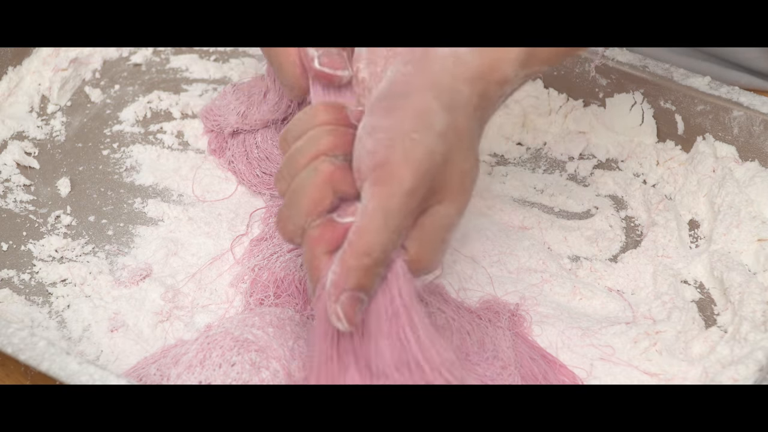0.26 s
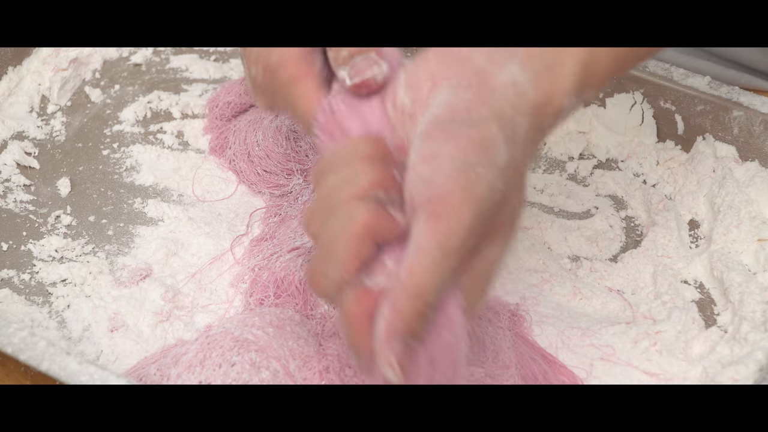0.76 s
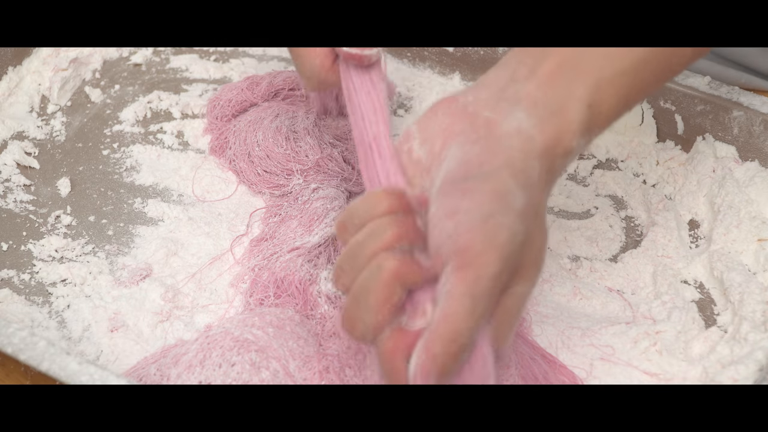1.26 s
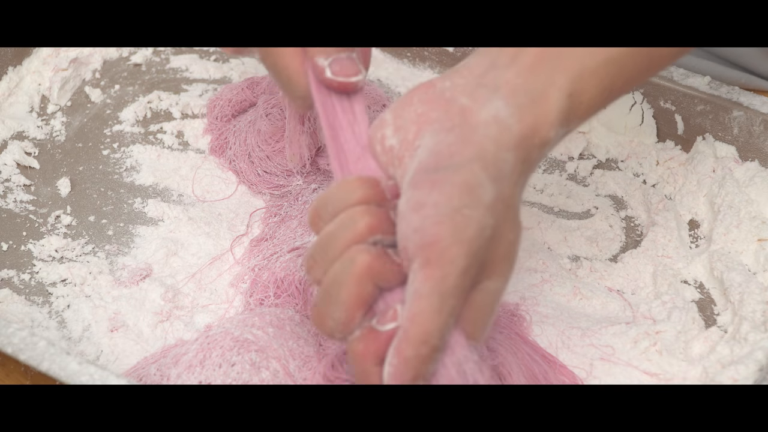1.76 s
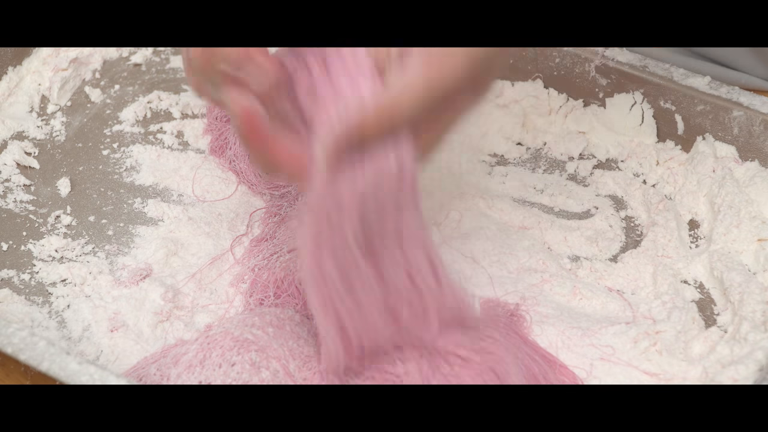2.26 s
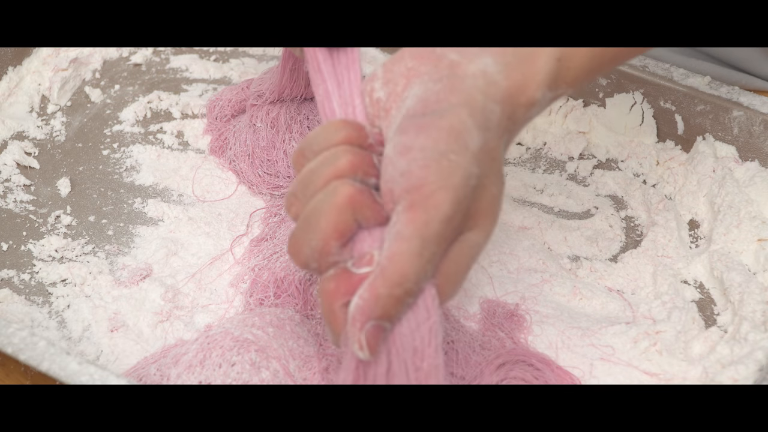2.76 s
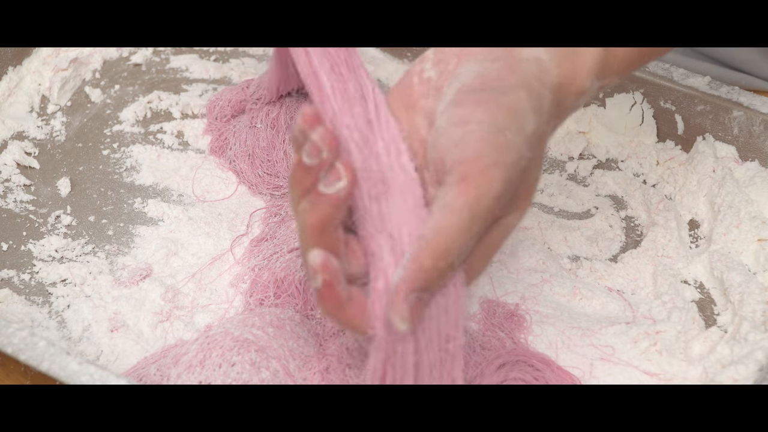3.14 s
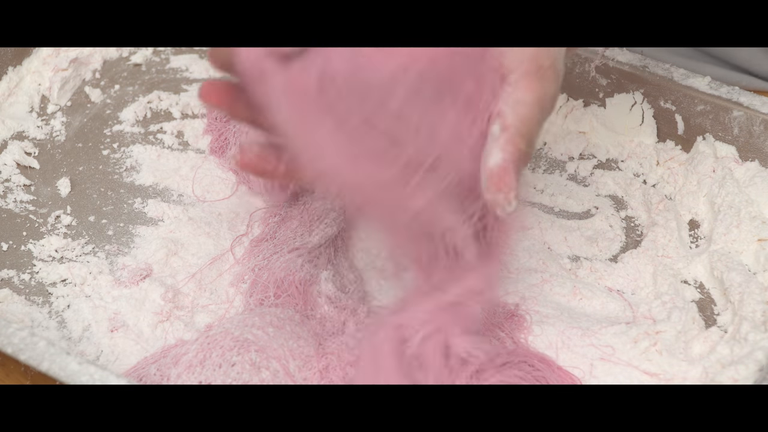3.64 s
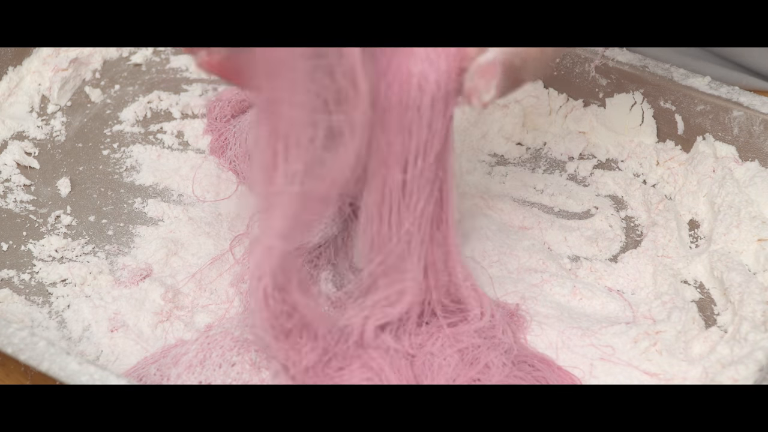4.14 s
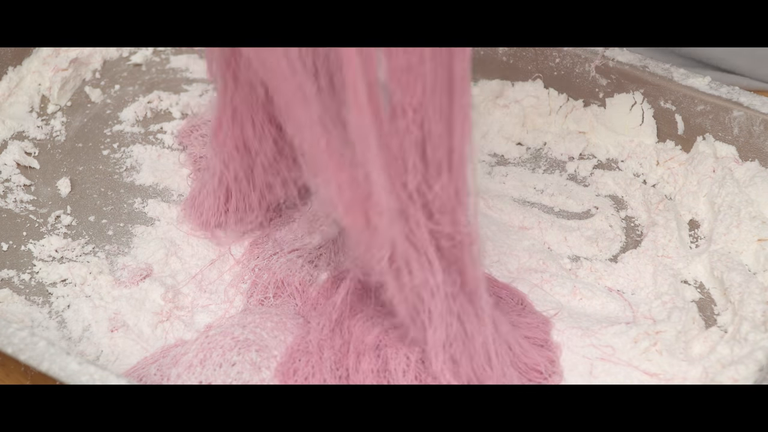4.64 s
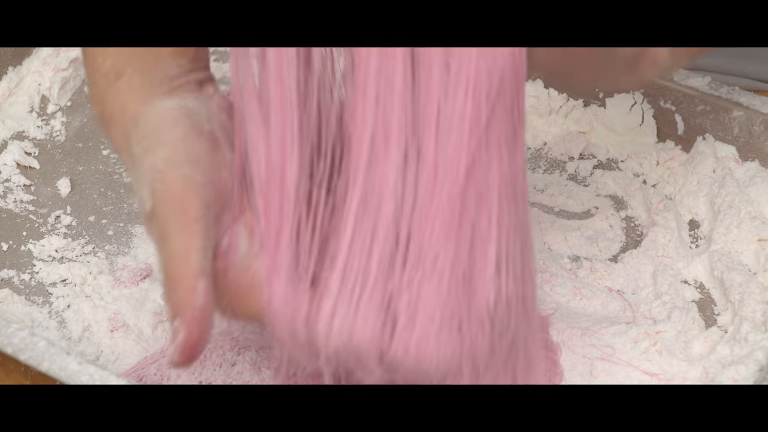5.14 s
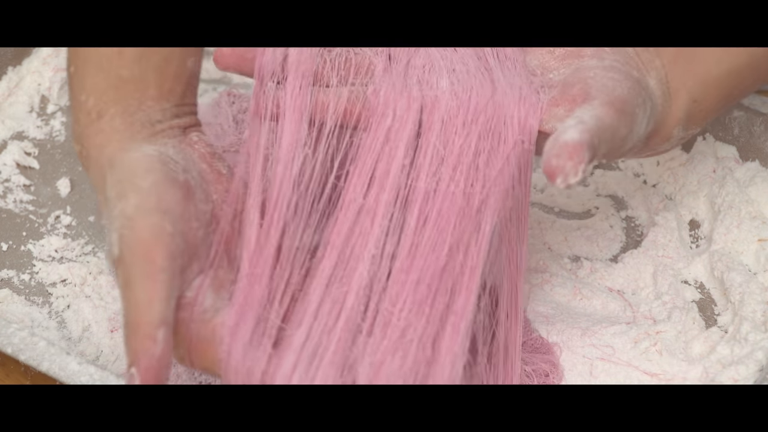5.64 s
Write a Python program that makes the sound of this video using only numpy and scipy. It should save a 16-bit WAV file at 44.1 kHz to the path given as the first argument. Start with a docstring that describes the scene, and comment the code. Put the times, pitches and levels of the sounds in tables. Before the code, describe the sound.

Close dry rustling swishes of fine candy strands pulled through powder, small finger ticks, a squeaky distant bird call and one crisp snap in a humming hall.

```python
"""Candy strands and a bird in a hall

Hands pull and fold a skein of fine candy strands in a tray of cornstarch, close to the microphone.
Rubbing and powder hiss are shaped noise; finger ticks and a snapping strand are damped modes; folds are low pulses.
Farther off in an echoing hall with a low hum, a bird whistles faintly and then gives a squeaky two-note call:
nearly pure tones on gliding pitches, the call roughened by a fast trill."""
import sys
import numpy as np
from scipy import signal
from scipy.fft import rfft, irfft, next_fast_len
from scipy.io import wavfile
from scipy.ndimage import map_coordinates

SR = 44100
rng = np.random.default_rng(int(sys.argv[2]) if len(sys.argv) > 2 else 0)


def wav_record(signal):
    """Record a signal, one row per channel, as 16-bit PCM in the file named by sys.argv[1]."""
    frames = np.transpose(np.atleast_2d(signal))
    bounded = np.clip(frames, -1, 1)
    # unit amplitude maps onto the largest positive 16-bit level
    quanta = np.round(bounded * 32767).astype(np.int16)
    wavfile.write(sys.argv[1], SR, quanta)


N = 260631  # length [samples]
TIME = np.arange(N) / SR  # [s]

# Steady air noise of the hall, relative spectrum: (frequency [Hz], density [dB per Hz])
AIR_SPECTRUM = [(15, -24), (30, -15.5), (52, 3), (75, -8.5), (150, -5), (290, -8.5), (500, -16),
                (1000, -21.5), (2000, -25), (3700, -27.5), (4900, -27.5), (6200, -31), (15800, -35)]
# Partials of the mains hum: (frequency [Hz], rms level [dB])
HUM_PARTIALS = [(100, -68), (150, -77), (205, -82)]
# Reverberation of the hall: (frequency [Hz], time to fall 60 dB [s])
HALL_DECAY = [(300, 1), (3000, 0.94), (6000, 0.91), (14000, 0.2)]

# Pulls along the skein: (up to speed at [s], length [s], rubbing in the grip at that time [dB],
# powder hiss at its own start [dB], gain or loss of speed [dB per s])
PULLS = [(0.015, 0.026, -57.5, -61, -10), (0.126, 0.21, -66.5, -66.5, -24), (0.39, 0.15, -44.5, -43, -82),
         (0.583, 0.15, -63, -55, -36), (0.793, 0.15, -58.5, -61, 12), (0.986, 0.031, -60, -65, -20),
         (1.055, 0.16, -68.5, -76, -17), (1.342, 0.22, -62, -60, 13), (1.618, 0.13, -54, -50.5, -2),
         (1.795, 0.22, -59.5, -62, -95), (2.195, 0.19, -59, -57, 7), (2.455, 0.12, -58, -53.5, 24),
         (2.636, .12, -62, -68, -31), (2.82, 0.13, -69, -69.5, 20), (2.975, 0.12, -60, -60, 0),
         (3.239, 0.18, -64.5, -67, 18), (3.499, 0.15, -56.5, -57, -33), (3.68, .16, -62, -67, -26),
         (3.952, 0.081, -62, -60, -24), (4.07, 0.15, -64, -61, -7), (4.215, 0.15, -69.5, -64, -34),
         (4.517, 0.066, -62.5, -60, -36), (4.747, .57, -68, -66, -18.5)]
# Strands rubbing, relative spectrum: (frequency [Hz], density [dB per Hz])
RUB_SPECTRUM = [(200, -22), (600, -9.5), (1100, -9.5), (1350, -2.5), (1750, -0.5), (2250, 2), (3050, -6),
                (3600, -2.5), (4400, -1), (5300, -5), (6600, -11), (9000, -10.5), (16000, -28)]
# Starch hissing, relative spectrum: (frequency [Hz], density [dB per Hz])
POWDER_SPECTRUM = [(500, -17.5), (1200, -8), (2300, -6), (3050, -9), (4400, 0), (6500, -5.5), (9000, -3.5),
                   (12000, -3), (15500, -3)]
# Finger ticks, before softening: (time [s], level [dB], low knock relative to the tick [dB])
TICKS = [(0.068, -42, 0), (.2885, -42.5, -30), (1.785, -35, -0.5), (1.977, -47, -12), (1.995, -44, -17),
         (2.618, -33.5, -4.5)]
# Modes of a finger tick: (frequency [Hz], relative level [dB], time to fall 60 dB [s])
FINGER_MODES = [(850, -5, 0.002), (1650, -6.5, 0.006), (2400, -1.5, 0.0037)]
# Brief slips of the skein: (time of the peak [s], level [dB], half length [s], centre frequency [Hz])
SLIPS = [(0.393, -41, 0.027, 3130), (0.412, -44, 0.019, 8500), (0.524, -51.5, 0.023, 7500),
         (1.352, -53.5, 0.025, 2900), (1.528, -48.5, 0.0082, 10000), (1.623, -46.5, 0.023, 14100),
         (1.52, -61, 0.022, 2000), (1.75, -54, 0.024, 2270), (1.82, -59, 0.028, 1190),
         (2.209, -58.5, .02, 2780), (2.283, -55.5, 0.016, 12000), (2.377, -49, 0.02, 12000),
         (2.458, -51.5, 0.017, 13000), (2.498, -54.5, .018, 2800), (2.58, -45, 0.0071, 3460),
         (2.98, -50.5, 0.029, 2680), (3.269, -57, 0.023, 10000), (3.372, -57, .019, 10000),
         (3.556, -60, 0.028, 1800), (3.636, -61, .014, 11000), (3.752, -59, 0.013, 10000),
         (3.909, -55.5, 0.014, 9600), (3.966, -60.5, 0.019, 7000), (4.09, -53.5, .009, 8850),
         (4.541, -57, 0.022, 4930), (4.783, -59.5, 0.012, 8450), (4.833, -63.5, .011, 11000),
         (4.948, -67.5, 0.16, 1580)]

# Faint whistles of the bird, levels at the source:
# (loudest at [s], rise [s], fall [s], level [dB], opening [Hz], middle [Hz], closing pitch [Hz])
WHISTLES = [(0.745, 0.021, 0.082, -61.5, 3340, 3444, 3450), (0.746, 0.021, .03, -59, 3820, 3930, 4070),
            (0.885, 0.063, 0.022, -53, 2850, 3190, 3120), (0.945, .06, 0.048, -58, 3620, 3456, 3580),
            (0.975, .08, .04, -64, 3580, 3670, 3680), (0.957, .02, 0.052, -55, 3320, 3194, 2980),
            (1.053, 0.0354, .04, -54, 3010, 2884, 2475), (1.13, .045, 0.051, -58, 2570, 2754, 2730),
            (5.105, .035, .08, -67, 3650, 3740, 3660)]
# Rising high note of the call, level at the source: (time [s], pitch [Hz], level [dB], trill depth [Hz])
HIGH_NOTE = [(2.745, 3400, -48, 50.3), (2.772, 3395, -39, 116), (2.79, 3482, -32.5, 181),
             (2.82, 3597, -24, 231), (2.875, 3686, -29.5, 255), (2.905, 3608, -29.5, 255),
             (3.0, 3723, -38.5, 167), (3.14, 3780, -64, 140)]
# Arching low note of the call, level at the source: (time [s], pitch [Hz], level [dB], trill depth [Hz])
LOW_NOTE = [(2.76, 2753, -48.5, 226.6), (2.83, 2933, -39, 290), (2.93, 2826, -47.5, 290),
            (2.98, 2743, -34.5, 187), (3.05, 2906, -30, 170), (3.18, 2860, -29, 170),
            (3.25, 2745, -35.5, 168), (3.34, 2737, -48, 120)]

# Folds landing in the starch: (time [s], level [dB], frequency [Hz])
FOLDS = [(0.854, -49.5, 60), (1.519, -47.5, 70.5), (1.639, -51.5, 49.5), (2.35, -49, 48.7),
         (3.908, -47, 60), (4.08, -41.5, 77.4), (4.276, -49.5, 66)]
# Quick steps in which one strand tears: (time [s], level [dB])
TEAR_STEPS = [(3.5215, -20.5), (3.5220, -29.5), (3.5224, -22)]
# Modes of each small tear: (frequency [Hz], relative level [dB], time to fall 60 dB [s])
TEAR_MODES = [(4440, -0.5, 0.002), (6440, -6.5, 0.0023), (8320, -9, 0.0037), (13800, -15, .002)]
# Modes of the freed strand: (frequency [Hz], level [dB], rise time [s])
STRAND_MODES = [(1820, -25.5, 0.00059), (2670, -33.5, 0.0012), (4410, -33, 0.00026)]


def amp(db):
    """Logarithmic level: 20 dB is a factor of ten in amplitude."""
    return 10 ** (np.asarray(db) / 20)


def unit(x):
    """Normalization: scale a signal to rms 1."""
    return x / np.sqrt(np.mean(x ** 2) + 1e-20)


def along(points, hz):
    """Logarithmic frequency scale: interpolate (frequency, value) points on it."""
    f, v = np.transpose(points)
    return np.interp(np.log(hz + 1), np.log(f + 1), v)


def wobble(rate):
    """Band-limited fluctuation: a smooth curve through random knots, rate of them per second."""
    knots = rng.standard_normal(int(N * rate / SR) + 4)
    return map_coordinates(knots, [TIME * rate])


def filtered(x, response):
    """Linear filtering: multiply the spectrum by a response of frequency."""
    m = next_fast_len(N + SR // 2)
    hz = np.fft.rfftfreq(m, 1 / SR)
    return irfft(rfft(x, m) * response(hz), m)[:N]


def coloured(x, spectrum):
    """Spectral shaping: weight a signal by a tabulated spectrum, at rms 1."""
    return unit(filtered(x, lambda hz: amp(along(spectrum, hz))))


def grit(spread_db):
    """Stochastic friction: countless tiny slips, each of a random size."""
    sizes = amp(spread_db * rng.standard_normal(N))
    return rng.standard_normal(N) * sizes


def ring(modes):
    """Modal decay: one contact excites sinusoids that each die exponentially."""
    t = np.arange(SR // 10) / SR
    return sum(amp(db - 60 * t / t60) * np.sin(2 * np.pi * hz * t) for hz, db, t60 in modes)


def add(track, s, sound):
    """Superposition: mix a sound into the track at time s."""
    part = track[round(s * SR):][:len(sound)]
    part += sound[:len(part)]


def background(air_rms_db=-59.5):
    """Stationary noise: rumble and hiss of the hall, plus a mains hum with slightly wandering phases."""
    air = amp(air_rms_db) * coloured(rng.standard_normal(N), AIR_SPECTRUM)
    hum = np.zeros(N)
    for hz, rms_db in HUM_PARTIALS:
        phase = 2 * np.pi * hz * TIME + 0.21 * wobble(3.4)
        hum += np.sqrt(2) * amp(rms_db) * np.sin(phase)
    return air + hum


def hall(x):
    """Diffuse reverberation: convolve with a noise tail whose frequencies each decay at their own speed."""
    hz, t, z = signal.stft(rng.standard_normal(SR + SR // 2), SR, nperseg=256)
    decay = amp(-60 * t / along(HALL_DECAY, hz)[:, None])
    tail = signal.istft(z * decay, SR, nperseg=256)[1]
    return signal.fftconvolve(x, tail / np.linalg.norm(tail))[:N]  # tail of unit energy


def pull_gain(start, length, slope_db):
    """Exponential envelope: a pull takes hold, speeds up or slackens steadily, and lets go."""
    attack_db_per_s, release_db_per_s = 394, 305
    t = TIME - start
    steady = slope_db * np.clip(t, 0, length)
    attack = attack_db_per_s * np.minimum(t, 0)
    release = release_db_per_s * np.maximum(t - length, 0)
    return amp(steady + attack - release)


def swishes(powder_lag_s=0.0071):
    """Sliding friction: strands rub in the grip and the starch hisses just after, under one uneven drag."""
    rub_power, powder_power = np.zeros((2, N))
    for start, length, rub_db, powder_db, slope_db in PULLS:
        # overlapping pulls add in power
        rub_power += (amp(rub_db) * pull_gain(start, length, slope_db)) ** 2
        powder_power += (amp(powder_db) * pull_gain(start + powder_lag_s, length, slope_db)) ** 2
    drag = amp(1.46 * wobble(70))
    rub = np.sqrt(rub_power) * coloured(grit(spread_db=2.0), RUB_SPECTRUM)
    powder = np.sqrt(powder_power) * coloured(grit(spread_db=3.0), POWDER_SPECTRUM)
    return drag * (rub + powder)


def ticks(soft_hz=3500):
    """Catch and release: fingers excite a tick and a small tray knock, low-passed by the soft skin."""
    out = np.zeros(N)
    knock = ring([(382, 0.014, 0.01)])  # frequency [Hz], level [dB], time to fall 60 dB [s]
    for s, db, knock_db in TICKS:
        add(out, s, amp(db) * (ring(FINGER_MODES) + amp(knock_db) * knock))
    return signal.sosfilt(signal.butter(4, soft_hz, fs=SR, output="sos"), out)


def slips(octaves=0.89):
    """Band-limited friction: each brief slip is a swell of hiss with its own brightness."""
    out = np.zeros(N)
    for s, db, half_s, centre_hz in SLIPS:
        def band(hz):
            """Gaussian resonance: a bell on the octave scale."""
            return np.exp(-0.5 * (np.log2((hz + 1) / centre_hz) / octaves) ** 2)
        swell = np.exp(-0.5 * ((TIME - s) / half_s) ** 2)
        out += amp(db) * swell * unit(filtered(grit(spread_db=2.5), band))
    return out


def tone(pitch, overtone_db=-39):
    """Phase integration: the bird's nearly pure voice on a moving pitch, with a weak second harmonic."""
    phase = 2 * np.pi * np.cumsum(pitch) / SR
    return np.sin(phase) + amp(overtone_db) * np.sin(2 * phase)


def gate(start, end, edge_s=0.0056):
    """Gradual onset: linear edges open and close a note without a click."""
    return np.clip(np.minimum(TIME - start, end - TIME) / edge_s, 0, 1)


def whistles(waver_hz=18, flutter_db=2.5, edge_db=8):
    """Frequency glide: each soft whistle swells and fades while it slides through three pitches."""
    out = np.zeros(N)
    waver = waver_hz * wobble(150)
    for s, rise, fall, db, *slide_hz in WHISTLES:
        progress = np.interp(TIME, [s - rise, s, s + fall], [-1, 0, 1])
        swell = gate(s - rise, s + fall) * amp(db - edge_db * np.abs(progress))
        pitch = np.interp(progress, [-1, 0, 1], slide_hz)
        out += swell * tone(pitch + waver)
    return out * amp(flutter_db * wobble(101.5))


def squeak(note, trill_hz=105, rough=0.28, flutter_db=1.5):
    """Frequency modulation: a fast uneven trill makes a whistled note squeaky."""
    s, *columns = np.transpose(note)
    pitch, db, depth = (np.interp(TIME, s, column) for column in columns)
    trill_rate = trill_hz * (1 + 0.25 * wobble(120))
    trill = np.sin(2 * np.pi * np.cumsum(trill_rate) / SR) + rough * wobble(2 * trill_hz)
    level = amp(db + flutter_db * wobble(trill_hz))
    return gate(s[0], s[-1]) * level * tone(pitch + depth * trill)


def bird(direct_db=-4.5, echo_db=-3):
    """Direct and reverberant field: faint whistles and a two-note call, heard mostly through the hall."""
    song = whistles() + squeak(HIGH_NOTE) + squeak(LOW_NOTE)
    return amp(direct_db) * song + amp(echo_db) * hall(song)


def thumps(cycles=0.42):
    """Heavily damped impulse: a soft fold pushes once on the powder bed, with hardly any ring."""
    out, t = np.zeros(N), np.arange(SR // 5) / SR
    for s, db, hz in FOLDS:
        u = t * hz / cycles  # the envelope peaks at u = 1
        add(out, s, -amp(db) * u * np.exp(1 - u) * np.sin(2 * np.pi * hz * t))
    return out


def snap():
    """Brittle fracture: a hardened strand cracks in bright steps; its freed end swings up and soon dies."""
    out, t = np.zeros(N), np.arange(SR // 20) / SR
    for s, db in TEAR_STEPS:
        add(out, s, amp(db) * ring(TEAR_MODES))
    swing = np.zeros(len(t))
    for hz, db, rise in STRAND_MODES:
        envelope = t / rise * np.exp(1 - t / rise)
        swing += amp(db) * envelope * np.sin(2 * np.pi * hz * t)
    add(out, np.mean([s for s, db in TEAR_STEPS]), swing)
    return out


def scene(hands_echo_db=-23.5):
    """Superposition of near and far: the hands are close and nearly dry, the bird is far."""
    hands = swishes() + slips() + ticks() + snap() + thumps()
    return (hands + amp(hands_echo_db) * hall(hands) + bird() + background())[None]


def record(dry, top_hz=15850):
    """Band limitation: the recorder keeps nothing above its top frequency."""
    return np.array([filtered(channel, lambda hz: hz < top_hz) for channel in dry])


dry = scene()
out = record(dry)
wav_record(out)
```